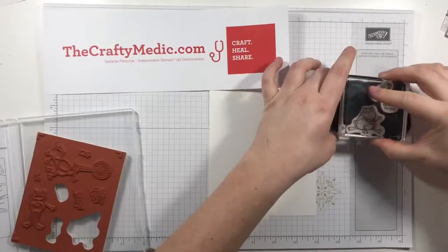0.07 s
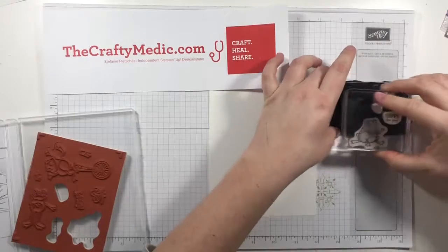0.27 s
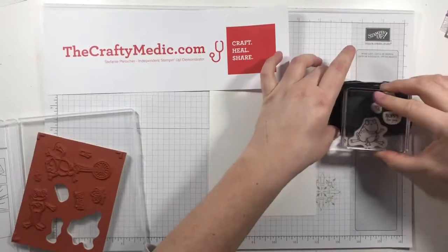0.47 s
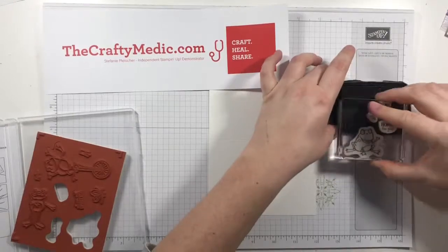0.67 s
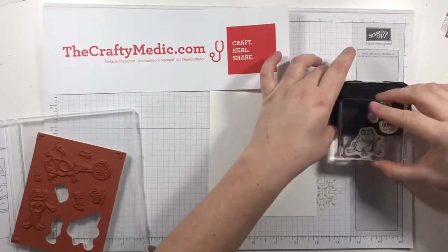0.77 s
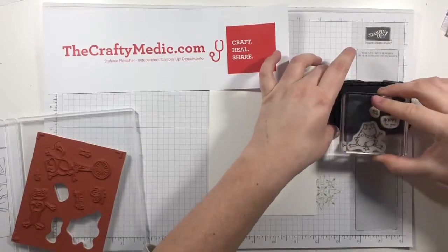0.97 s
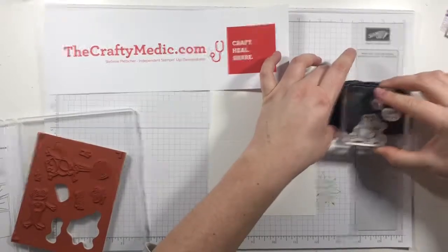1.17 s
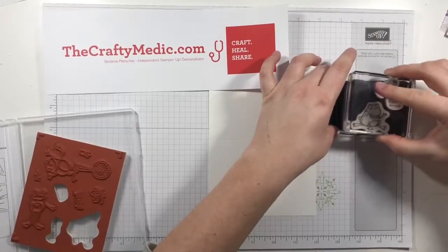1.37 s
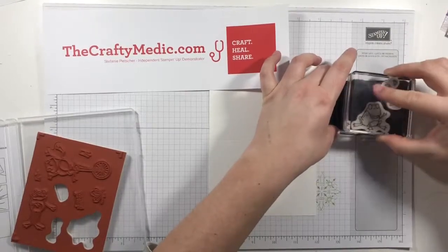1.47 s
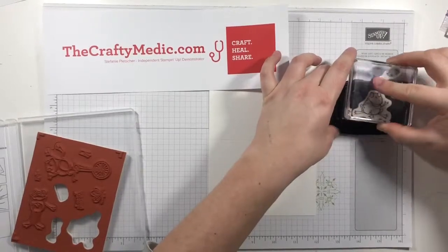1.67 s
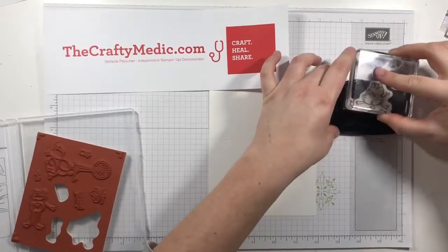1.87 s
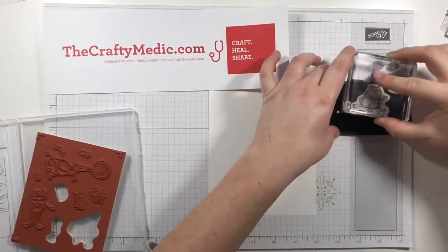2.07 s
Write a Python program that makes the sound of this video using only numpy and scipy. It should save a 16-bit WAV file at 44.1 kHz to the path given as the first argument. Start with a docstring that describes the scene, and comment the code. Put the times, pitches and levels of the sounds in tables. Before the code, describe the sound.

A clear acrylic stamp block is tapped on an ink pad on a craft table for about two seconds. A light knock and a faint sticky crackle open the sound. Firm, hollow knocks on the pad's plastic case follow at about 0.35 and 0.7 seconds, each with a dull thump through the table and a small click between them. Near 1.0 seconds there is only a soft bump. The taps then come a little faster: a moderate, dull one at 1.25 and a softer one at 1.45, with faint ticks and ink crackles around them. Just after 1.6 the ink peels and the block clicks, leading into a hard, brighter knock near 1.7. Light clicks at 1.8 and a soft thump near 1.85 finish it. The microphone is close and favours the upper middle tones, with little treble, brief small-room echoes and a faint low rumble.

```python
"""Short, hollow knocks and dull thumps, some hard and some soft, with light ticks in a small room.
A clear acrylic stamp block is tapped again and again on an ink pad that lies on a craft table.
Hard taps knock the pad's plastic case, and every push also thumps the table. The block ticks as it
touches and lifts, and the sticky ink crackles faintly. The microphone is close and favours the
upper middle tones, with little treble."""
import sys
import numpy as np
from scipy import signal
from scipy.fft import rfft, irfft, next_fast_len
from scipy.io import wavfile

SR = 44100
rng = np.random.default_rng(int(sys.argv[2]) if len(sys.argv) > 2 else 0)


def int16_out(signal):
    """Quantize to a 16-bit WAV file."""
    q = np.round(np.clip(np.atleast_2d(signal).T, -1, 1) * 32767)
    wavfile.write(sys.argv[1], SR, q.astype(np.int16))


N = 93403

# the block lands on the pad: t/s, force/dB, treble cut-off/Hz, hand's weight/dB, touch crackle/dB
TAPS = [(-0.015, -33, 1003, -44.5, -40), (0.3583, -19.5, 1570, -48, -40), (0.7012, -25, 1160, -44, -38),
        (0.988, -57, 500, -43.5, -30), (1.234, -31.5, 800, -39, -11.5), (1.4588, -39.5, 584, -39, -16),
        (1.6696, -20, 2300, -53, -15.5), (1.862, -44.5, 446, -45, -18)]
# the tones of the bare acrylic block: f/Hz, level/dB, ring time/s
BLOCK_TONES = [(1190, -15.5, 0.0094), (1408, -3.5, 0.01), (1828, -10, 0.018), (2256, -4, 0.0085),
               (2470, -9, 0.014), (2838, -4, 0.011), (4190, -17, 0.017)]
# the bright tone colour of a crackle: f/Hz, level/dB
CRACKLE_COLOUR = [(500, -18), (2500, -9.5), (4500, 7), (6300, 4.5), (7700, 13.5), (10000, 5), (15000, 16.5)]


def amp(db):
    """Turn decibels into a factor to multiply by."""
    return 10 ** (np.asarray(db) / 20)


def unit(x):
    """Scale a sound to an average (rms) level of 1."""
    return x / np.sqrt(np.mean(x ** 2) + 1e-20)


def along(points, hz):
    """Read a curve of (frequency, value) points at hz, with octaves evenly spaced."""
    freqs, values = np.transpose(points)
    return np.interp(np.log(hz + 1), np.log(freqs + 1), values)


def filtered(x, response):
    """Scale and delay each frequency of a sound as response(hz) says."""
    size = next_fast_len(len(x) + SR // 4)
    return irfft(rfft(x, size) * response(np.fft.rfftfreq(size, 1 / SR)), size)[:len(x)]


def coloured(x, points, size=4096):
    """Give a sound the tone colour drawn by (f/Hz, level/dB) points."""
    cepstrum = irfft(np.log(amp(along(points, np.fft.rfftfreq(size, 1 / SR)))))
    # fold onto the first half, so the filter rings only after a sound, never before it
    cepstrum[1:size // 2] *= 2
    cepstrum[size // 2 + 1:] = 0
    return signal.fftconvolve(x, irfft(np.exp(rfft(cepstrum))))[:len(x)]


def add(track, s, sound):
    """Mix a sound into the track at s seconds."""
    start = round(s * SR)
    sound = sound[max(-start, 0):]
    part = track[max(start, 0):][:len(sound)]
    part += sound[:len(part)]


def struck(tones):
    """A struck object's tones each fade by 60 dB in their ring time; their strengths vary by blow."""
    t = np.arange(SR // 2) / SR
    scatter_db = rng.normal(0, .8, len(tones))
    return sum(amp(db + offset - 60 * t / ring_s) * np.sin(2 * np.pi * hz * t)
               for (hz, db, ring_s), offset in zip(tones, scatter_db))


def cushioned(x, cut_hz):
    """A softer contact lasts longer and makes less treble."""
    return signal.sosfilt(signal.butter(2, cut_hz, fs=SR, output="sos"), x)


def thinned(x, cut_hz):
    """Cut the bass: an object sends out little below a frequency set by its size."""
    return signal.sosfilt(signal.butter(2, cut_hz, "high", fs=SR, output="sos"), x)


def dispersed(x, lag_s):
    """In a bending plate treble outruns bass, so a blow chirps down; lag_s is the travel time at 1 kHz."""
    return filtered(x, lambda hz: np.exp(-4j * np.pi * lag_s * np.sqrt(1000 * hz)))


def in_room(x, echo_db, gap_s=.009):
    """After a short gap, the room answers a sound with a fading wash of echoes."""
    # how long the room takes to fade by 60 dB: f/Hz, ring time/s
    ring_times = [(100, 0.71), (400, 0.22), (1000, 0.5), (2500, 0.45), (5000, 0.36), (12000, 0.17)]
    # the tone colour of the echoes: f/Hz, level/dB
    echo_colour = [(60, -1), (300, -4), (500, -1.5), (1000, -6), (2500, -7), (4000, -8.5), (12000, -6.5)]
    hz, t, noise = signal.stft(rng.standard_normal(SR // 2), SR, nperseg=256)
    fade = amp(-60 * t / along(ring_times, hz)[:, None])
    tail = signal.istft(noise * fade, SR, nperseg=256)[1]
    tail = coloured(tail / np.linalg.norm(tail), echo_colour)
    out = x.copy()
    add(out, gap_s, amp(echo_db) * signal.fftconvolve(x, tail))
    return out


def room_tone():
    """The still room rumbles low under the microphone's thin, even hiss."""
    # the tone colour of rumble and hiss: f/Hz, relative level/dB
    noise_colour = [(20, -28), (50, -8), (100, -1), (250, -3), (600, -11), (1200, -13), (1800, -19),
                    (2450, -13), (3100, -23), (5000, -26), (8000, -28.5), (15000, -30)]
    noise = filtered(rng.standard_normal(N), lambda hz: amp(along(noise_colour, hz)))
    return amp(-67.5) * unit(thinned(noise, cut_hz=33))


def ink_peels(snaps_per_s=900):
    """Threads of ink snap in a quick, uneven run and rattle the block."""
    # sticky ink clings and lets go: t/s, length/s, level/dB, crackle against rattle/dB
    peels = [(0.005, 0.0454, -62.5, -2.5), (1.377, 0.043, -70, -5.5), (1.455, 0.015, -62.5, -1),
             (1.6388, 0.026, -52, 1.5)]
    track, t = np.zeros(N), np.arange(SR // 2) / SR
    for s, length, db, crackle_db in peels:
        swell = np.sin(np.pi * np.minimum(t / length, 1)) ** .5
        snaps = (rng.random(len(t)) < snaps_per_s / SR) * rng.standard_normal(len(t))
        rattle = signal.fftconvolve(snaps, struck(BLOCK_TONES))[:len(t)]
        rasp = unit(rattle) + amp(crackle_db) * unit(coloured(snaps, CRACKLE_COLOUR))
        add(track, s, amp(db) * in_room(swell * rasp, echo_db=0))
    return track


def block_ticks(touch_lead_s=0.001785, touch_rise_s=0.001, click_rise_s=0.00056, crackle_fade_s=0.036):
    """Light contacts just before and between taps ring only the acrylic, with a brief crackle on top."""
    # the block's edges click against the case between taps: t/s, level/dB, crackle/dB
    clicks = [(0.025, -68, -28.5), (0.5415, -53, -8), (1.357, -53, -24), (1.565, -58, -7),
              (1.6438, -34, -6), (1.799, -43, -0.5), (1.803, -38.5, -17)]
    # on each tap an edge touches first, louder when the tap is harder
    touches = [(s - touch_lead_s, -23 + 0.47 * force_db, crackle_db)
               for s, force_db, _, _, crackle_db in TAPS]
    track, t = np.zeros(N), np.arange(SR // 2) / SR
    for contacts, rise_s in [(touches, touch_rise_s), (clicks, click_rise_s)]:
        for s, db, crackle_db in contacts:
            hiss = coloured(rng.standard_normal(len(t)), CRACKLE_COLOUR)
            crackle = amp(crackle_db - 60 * t / crackle_fade_s) * hiss
            ring = dispersed(struck(BLOCK_TONES), lag_s=0.000804)
            tick = thinned(ring + crackle, cut_hz=1000) * (1 - np.exp(-t / rise_s))
            add(track, s, amp(db) * in_room(tick, echo_db=-3.5))
    return track


def table_thuds(delay_s=0.0039):
    """Each tap sends a deep, slower thud through the table, which sinks in pitch."""
    # the table's slowest ways of bending: f/Hz, level/dB, ring time/s
    deep_tones = [(66.2, 6, 0.14), (94.7, 12.5, 0.13), (124, -19, 0.023)]
    track = np.zeros(N)
    for s, force_db, *_ in TAPS:
        bend = cushioned(struck(deep_tones), cut_hz=101)
        thud = dispersed(thinned(bend, cut_hz=41), lag_s=0.00354)
        thud_db = -22.5 + 0.63 * force_db
        add(track, s + delay_s, amp(thud_db) * in_room(thud, echo_db=-15))
    return track


def hand_pushes(delay_s=.0025, edge_echo_s=.025, edge_echo_db=-8):
    """The pad gives way, then the hand's weight bumps the table; the bump returns once from its edge."""
    # the table's higher tones under the pad: f/Hz, level/dB, ring time/s
    table_tones = [(147, -5.5, 0.041), (253.6, 7.5, 0.045), (304.6, -4, 0.087)]
    # the hand shifts its weight between taps: t/s, level/dB
    nudges = [(0.627, -51), (1.309, -48)]
    presses = [(s, weight_db) for s, _, _, weight_db, _ in TAPS]
    track = np.zeros(N)
    for s, db in presses + nudges:
        soft_push = cushioned(struck(table_tones), cut_hz=387)
        bump = amp(db) * dispersed(soft_push, lag_s=0.002857)
        add(track, s + delay_s, in_room(bump, echo_db=-7))
        add(track, s + delay_s + edge_echo_s, amp(edge_echo_db) * bump)
    return track


def case_knocks(bounce_s=0.00445, bounce_db=-7):
    """The block lands on the case and bounces once: a hollow clack and a faint ring of the table top."""
    # block and case, muffled by the hands: f/Hz, level/dB, ring time/s
    case_tones = [(460.3, 1, 0.031), (541.7, -5.5, 0.059), (726, -12.5, 0.042), (780.6, -2.5, 0.023),
                  (933, -8.5, 0.025), (1151, -8.5, 0.026), (1359, -10, 0.027), (1596, -10, 0.025),
                  (1902, -14, 0.029), (2470, -3.5, 0.0057)]
    # the table top rings on after a knock: f/Hz, level/dB, ring time/s
    table_top_tones = [(159.8, -27.5, 0.66), (431.2, -18, 0.17), (463.7, -16.5, 0.18), (510, -19, 0.23),
                       (558.5, -18.5, 0.22), (726, -18.5, 0.073), (821, -26, 0.16), (1290, -25.5, 0.19)]
    track = np.zeros(N)
    for s, force_db, contact_hz, _, _ in TAPS:
        blow = thinned(cushioned(struck(case_tones), contact_hz), cut_hz=260)
        clack = blow.copy()
        add(clack, bounce_s, amp(bounce_db) * cushioned(blow, cut_hz=970))
        ring = dispersed(cushioned(struck(table_top_tones), contact_hz), lag_s=.009)
        knock = in_room(dispersed(clack, lag_s=0.002051), echo_db=-7, gap_s=0.014)
        add(track, s, amp(force_db) * (knock + ring))
    return track


def scene():
    """The tapping as the microphone hears it, over the quiet room, in one channel."""
    # how strongly the microphone picks up each frequency: f/Hz, level/dB
    microphone = [(30, -12), (100, -8), (1900, 4.5), (2500, 7.5), (2900, -3), (3400, -2), (5000, -6.5),
                  (15000, -38)]
    tapping = case_knocks() + hand_pushes() + table_thuds() + block_ticks() + ink_peels()
    return (coloured(tapping, microphone) + room_tone())[None]


def record(dry):
    """The recorder keeps nothing above its highest frequency."""
    top_hz = 15800
    return np.array([filtered(channel, lambda hz: hz < top_hz) for channel in dry])


dry = scene()
out = record(dry)
int16_out(out)
```